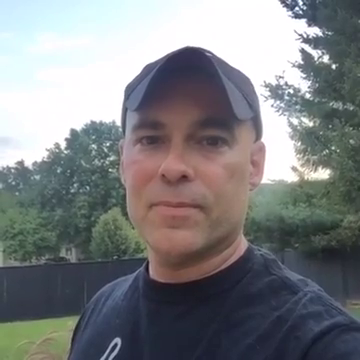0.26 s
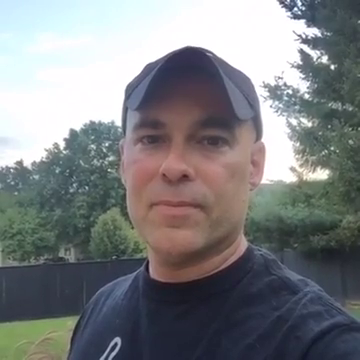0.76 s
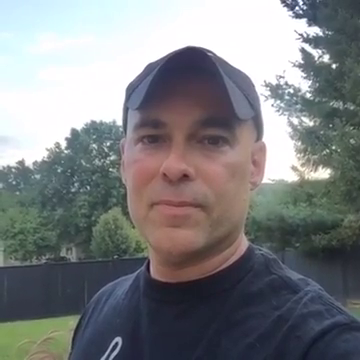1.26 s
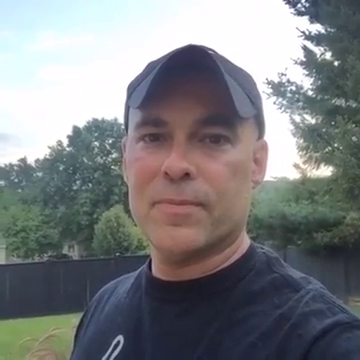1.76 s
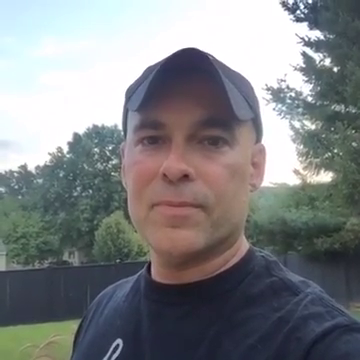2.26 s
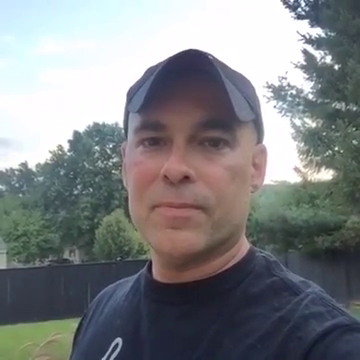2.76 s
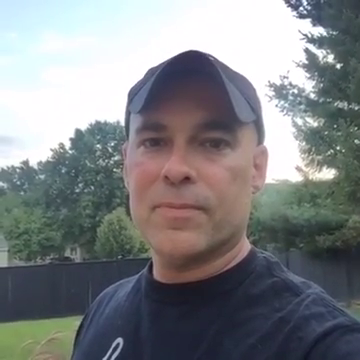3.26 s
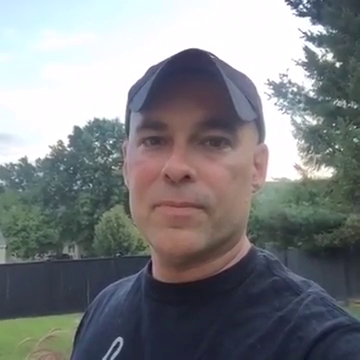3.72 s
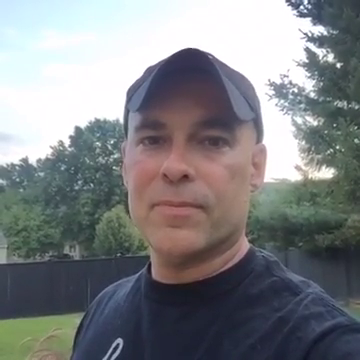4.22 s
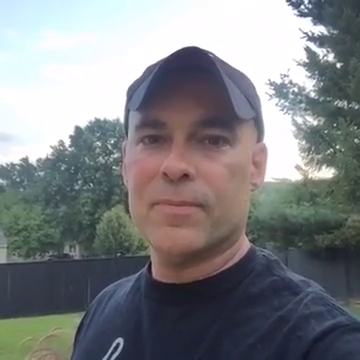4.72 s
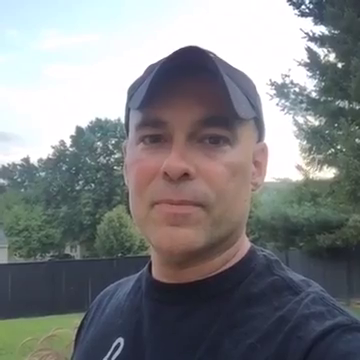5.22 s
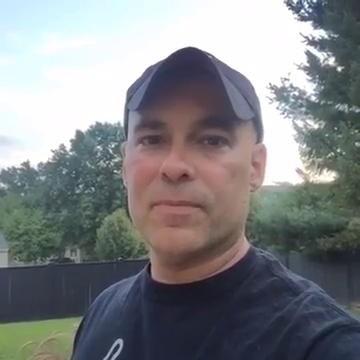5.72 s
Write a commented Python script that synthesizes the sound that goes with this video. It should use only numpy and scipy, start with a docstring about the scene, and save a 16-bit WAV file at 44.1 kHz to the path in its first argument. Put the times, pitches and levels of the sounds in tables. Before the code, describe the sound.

From the start, a steady, high chorus of crickets and far insects fills a backyard at dusk. Two cicadas buzz in the trees, pulsing out of step: one bright and sizzling, the other duller with a slight ring. The brighter one grows louder at around 1 second, and both quicken gradually from about four or five pulses a second to about seven. Underneath, distant traffic rumbles, a machine hums faintly, and soft road whines come and go, at around 2.6, 3.4 and 5.4 seconds. A vehicle slowly draws nearer. Its low exhaust drone emerges and throbs at about 3.4 seconds, then becomes louder and harsher from around 4 seconds. The hiss of its tyres keeps growing until the end, at about 6 seconds, with the insects still singing above it.

```python
"""A backyard at dusk. From the start, two cicadas pulse out of step in the trees, buckling their ribs in
fast clicks, over a steady chorus of far insects and crickets trilling with their wings. Distant traffic
rumbles, a machine hums faintly, and road whines come and go. As the cicadas quicken, a vehicle draws
slowly nearer: its droning exhaust throbs at about 3.4 s, then turns harsher, and the hiss of its tyres
grows to the end."""
import sys
import numpy as np
from scipy import signal
from scipy.fft import rfft, irfft, next_fast_len
from scipy.io import wavfile

SR = 44100
rng = np.random.default_rng(int(sys.argv[2]) if len(sys.argv) > 2 else 0)


def to_wav(s):
    """Save 16-bit WAV."""
    ch = np.atleast_2d(s).T  # columns
    pcm = np.round(np.clip(ch, -1, 1) * 32767)  # PCM
    wavfile.write(sys.argv[1], SR, pcm.astype(np.int16))


N = 263714
TIME = np.arange(N) / SR


def from_db(db):
    """Turn decibels into a number to multiply a sound by."""
    return np.exp(np.asarray(db) * (np.log(10) / 20))


def rms_one(x):
    """Scale a sound so that its average strength (rms) is 1."""
    return x / np.sqrt(np.mean(x ** 2) + 1e-20)


def in_time(rows):
    """Join a table's points with straight lines: one curve for each column after the time."""
    times, *columns = np.transpose(rows)
    return [np.interp(TIME, times, column) for column in columns]


def coloured(x, points):
    """Make some pitches stronger than others, fading 20 dB an octave beyond the table's ends; rms 1."""
    hz, db = np.transpose(points)
    size = next_fast_len(N, real=True)
    octave, known = np.log2(np.fft.rfftfreq(size, 1 / SR) + 1), np.log2(hz)
    outside = np.abs(octave - np.clip(octave, known[0], known[-1]))
    gain = from_db(np.interp(octave, known, db) - 20 * outside)
    return rms_one(irfft(rfft(x, size) * gain, size)[:N])


def above(x, hz):
    """The part of a sound above a frequency."""
    return signal.sosfiltfilt(signal.butter(6, hz, "high", fs=SR, output="sos"), x)


def drift(rate):
    """A smooth random wobble of rms 1, changing about rate times a second."""
    step = 40   # samples between random values
    memory = np.exp(-2 * np.pi * rate * step / SR)
    noise = rng.standard_normal(N // step + 2002)
    slow = signal.lfilter([1], [1, -2 * memory, memory ** 2], noise)[2000:]
    return np.interp(np.arange(N) / step, np.arange(len(slow)), rms_one(slow))


def swell_at(s, width_s):
    """A smooth rise and fall of height 1, peaking at time s."""
    return np.exp(-((TIME - s) / width_s) ** 2 / 2)


def fading_tone(hz, share, rate):
    """A tone that flutters because a share of it arrives by shifting paths."""
    angle = 2 * np.pi * (np.cumsum(hz) / SR % 1)
    direct = np.sqrt(2 * (1 - share)) * np.sin(angle)
    scattered = drift(rate) * np.sin(angle) + drift(rate) * np.cos(angle)
    return direct + np.sqrt(share) * scattered


def foliage(x, echo_s):
    """Leaves, fence and ground send back many tiny echoes, which fade by 60 dB in echo_s."""
    t = np.arange(SR // 4) / SR
    paths = rng.standard_normal(len(t)) * from_db(-60 * t / echo_s)
    with_lead_in = np.concatenate([x[-len(t):], x])
    return rms_one(signal.fftconvolve(with_lead_in, paths)[len(t):len(t) + N])


def rib_buzz(clicks_per_s, jitter, echo_s, far_share):
    """An insect's ribs buckle in fast, uneven clicks; part of the buzz arrives blurred to a hiss."""
    turns = np.cumsum(clicks_per_s * (1 + jitter * drift(150))) / SR
    clicks = np.diff(np.floor(turns), prepend=0) * from_db(rng.standard_normal(N))
    return np.sqrt(1 - far_share) * foliage(clicks, echo_s) + np.sqrt(far_share) * rng.standard_normal(N)


def pulse_progress(pulses):
    """How far a cicada is through its current pulse, from 0 to 1, and how hard it sings there."""
    starts, accent_db = np.transpose(pulses)
    edges = np.append(starts, 2 * starts[-1] - starts[-2])
    count = np.interp(TIME, edges, np.arange(len(edges)))
    return count % 1, np.interp(count, np.arange(len(starts)) + .5, accent_db)


def belly_swell(progress, lateness, sharpness, dip_db):
    """The belly stretches and relaxes: a swell from dip to dip, peaking late if lateness > 1."""
    swell = np.abs(np.sin(np.pi * progress ** lateness)) ** sharpness
    return from_db(dip_db) + (1 - from_db(dip_db)) * swell


# How the near cicada's song changes; its "top" lies above 10 kHz and its "sizzle" above 13 kHz:
# (time [s], level [dB], top boost [dB], further sizzle boost [dB], top's dip between pulses [dB])
NEAR_CICADA_SONG = [(0, -56, 5, 0, -7), (.7, -53.5, 3, 1, -7), (1.3, -46.5, -0.5, 1, -13),
                    (2.5, -46.3, 1, .5, -13), (3.4, -45, 0.3, -2.5, -14), (4.2, -43.5, -2.6, -8.5, -22),
                    (5.1, -44.9, -0.7, -5, -21), (5.98, -47.2, -1.6, -3, -18)]
# Its pulses, each lasting until the next: (start time [s], accent [dB])
NEAR_CICADA_PULSES = [(-.13, 0), (.08, 0), (.28, 0), (.51, .5), (.73, 1), (.928, -1), (1.125, 0), (1.31, 0),
                      (1.507, -1.5), (1.68, 0), (1.874, -.5), (2.061, -1.5), (2.248, -1), (2.425, 0),
                      (2.601, 0), (2.787, .5), (2.97, -1.5), (3.144, 0), (3.32, 0), (3.484, 0), (3.663, 0),
                      (3.847, -1), (3.989, -.5), (4.132, .5), (4.275, -.5), (4.421, -.5), (4.58, -.5),
                      (4.71, -.5), (4.876, 0), (5.021, -.5), (5.192, -1.5), (5.345, .5), (5.477, 1),
                      (5.611, -1.5), (5.76, 0), (5.932, -1)]
# The tone colour of its buzz: (frequency [Hz], relative level [dB])
NEAR_CICADA_COLOUR = [(2800, -60), (3900, -7), (5100, -17), (6200, 3.5), (7100, -2.5), (8200, -7.5),
                      (9000, -16), (9900, -16.5), (10300, -27.5), (11000, -27), (11600, -18),
                      (12600, -18.3), (14000, -23.5), (14400, -28.5), (15200, -32)]
def near_cicada():
    """A bright buzz whose pulses quicken unevenly; the top of each pulse swells before its body."""
    level_db, top_db, sizzle_db, top_dip_db = in_time(NEAR_CICADA_SONG)
    progress, accent_db = pulse_progress(NEAR_CICADA_PULSES)
    clicks = rib_buzz(clicks_per_s=680, jitter=.25, echo_s=.14, far_share=.28)
    buzz = coloured(clicks, NEAR_CICADA_COLOUR)
    top, sizzle = above(buzz, 10000), above(buzz, 13000)
    body = (buzz - top) * belly_swell(progress, lateness=1.6, sharpness=1.3, dip_db=-18)
    edge = (top + (from_db(sizzle_db) - 1) * sizzle) * from_db(top_db)
    edge *= belly_swell(progress, lateness=1.25, sharpness=1.25, dip_db=top_dip_db)
    tremble_db = .86 * drift(25)
    return from_db(level_db + accent_db + tremble_db) * (body + edge)


# The lower cicada's pulses: (time [s], relative buzz level [dB], ring level [dB])
LOW_CICADA_PULSES = [(.12, -47, -55.5), (.37, -47, -55.5), (.6, -48, -55.5), (.8, -49, -56.5),
                     (1.01, -48, -55), (1.25, -46.5, -60), (1.47, -45.5, -55.5), (1.635, -44, -55),
                     (1.85, -46, -56), (2.06, -46, -56), (2.22, -48, -55), (2.4, -48, -54),
                     (2.58, -48.5, -54.5), (2.77, -49, -55.5), (2.94, -48, -55.5), (3.12, -45.5, -59),
                     (3.31, -45.5, -59), (3.48, -45, -57.5), (3.68, -46, -59), (3.8, -50, -59),
                     (3.97, -47.5, -61), (4.1, -47, -57), (4.28, -46, -61), (4.43, -48, -61),
                     (4.56, -47, -60), (4.69, -46.5, -59), (4.85, -51, -62), (5.01, -48, -60),
                     (5.19, -47.5, -62), (5.32, -46, -59), (5.55, -47, -60), (5.71, -48, -60),
                     (5.86, -47, -58)]
# The tone colour of its buzz: (frequency [Hz], relative level [dB])
LOW_CICADA_COLOUR = [(2800, -28), (3400, -4.5), (3750, -7), (4000, 3), (4250, 0), (4600, 5), (5600, 6),
                     (6500, -28), (8000, -20), (10000, -53)]
def low_cicada(buzz_db=-3, ring_hz=4010):
    """A duller cicada's soft pulses run together as they quicken; its hollow body rings with each."""
    swells = sum(from_db(db) * swell_at(s, width_s=.043) for s, db, _ in LOW_CICADA_PULSES)
    chirps = sum(from_db(db) * swell_at(s, width_s=.027) for s, _, db in LOW_CICADA_PULSES)
    clicks = rib_buzz(clicks_per_s=520, jitter=.27, echo_s=.082, far_share=.8)
    buzz = coloured(clicks, LOW_CICADA_COLOUR)
    ring = fading_tone(ring_hz * (1 + .002 * drift(12)), share=.4, rate=45)
    return from_db(buzz_db) * swells * buzz + chirps * ring


def grainy_shimmer(length_s, spread_db, count=900):
    """Many short, faint tones at random pitches give the far buzz a grainy shimmer."""
    out = np.zeros(N + SR)
    for when, pitch, length, faintness in rng.random((count, 4)):
        size, start = int(SR * length_s * (.5 + length)), int(when * N)
        hz = 3500 + 5000 * pitch
        tone = np.sin(2 * np.pi * hz * np.arange(size) / SR)
        out[start:start + size] += from_db(-spread_db * faintness) * np.hanning(size) * tone
    return rms_one(out[:N])


# How loud the far insects are: (time [s], level [dB])
FAR_INSECT_LEVEL = [(0, -46), (1.2, -45.5), (1.9, -45), (2.6, -43.5), (4, -43.5), (5.2, -45.5), (5.98, -46)]
# Their tone colour: (frequency [Hz], relative level [dB])
FAR_INSECT_COLOUR = [(2700, -27), (3300, -13.5), (3650, -9.5), (4000, -6), (4900, -6), (5700, -0.5),
                     (6500, -0.5), (7500, -3.2), (8100, -9.3), (9000, -18), (9900, -24.5), (10300, -32.5),
                     (11000, -32), (12200, -30.5), (15200, -42)]
def far_insects(shimmer_db=-7):
    """Many far insects merge into one buzz, which has a grainy shimmer."""
    level_db, = in_time(FAR_INSECT_LEVEL)
    clicks = rib_buzz(clicks_per_s=1500, jitter=.4, echo_s=.067, far_share=.42)
    buzz = coloured(clicks, FAR_INSECT_COLOUR)
    shimmer = coloured(grainy_shimmer(length_s=.06, spread_db=19), FAR_INSECT_COLOUR)
    return from_db(level_db + .5 * drift(23)) * rms_one(buzz + from_db(shimmer_db) * shimmer)


# One row for each cricket: (wing pitch [Hz], level [dB], wing strokes [per s])
CRICKET_VOICES = [(4012, -72, 44), (4490, -71, 58), (4620, -73, 53), (5295, -67.5, 38), (5600, -64, 51),
                  (5674, -62, 47), (6000, -61, 55), (6127, -61, 41), (6250, -61, 62), (6394, -63, 45),
                  (6482, -61, 67), (6721, -65, 59), (6933, -63, 50), (7072, -60, 72), (7560, -63, 80),
                  (7950, -68, 64), (8400, -72, 70)]
def crickets(wander=.0018, sag=.0028, swell_db=2):
    """Each wing stroke rings a tone that sags in pitch; strokes run into a trill, blurred by leaves."""
    out = np.zeros(N)
    uneven_time = np.cumsum(1 + .0348 * drift(9.8)) / SR
    for hz, level_db, strokes_per_s in CRICKET_VOICES:
        stroke = (strokes_per_s * uneven_time + rng.random()) % 1   # 0 to 1 through each stroke
        pitch = hz * (1 + wander * drift(23.9) - sag * (stroke - .5))
        gain = from_db(level_db + swell_db * drift(12))
        out += gain * rms_one(stroke * (1 - stroke) * fading_tone(pitch, share=.43, rate=14.6))
    return out


def road_noise(colour, echo_share):
    """The roar of tyres and engines from afar; a share of it arrives as echoes."""
    direct, scattered = rng.standard_normal((2, N))
    echoes = foliage(scattered, echo_s=.06)
    return coloured(np.sqrt(1 - echo_share) * direct + np.sqrt(echo_share) * echoes, colour)


# The tone colour of far traffic: (frequency [Hz], relative level [dB])
RUMBLE_COLOUR = [(22, -33), (40, -10), (60, -2), (90, 1), (118, -3), (146, -1), (175, -10), (280, -20.5),
                 (380, -22), (470, -27), (680, -26), (950, -28), (1400, -30), (3000, -45.5)]
def traffic_rumble(level_db=-47.5):
    """Traffic on far roads blends into a low, wavering rumble."""
    return from_db(level_db + 1.3 * drift(22)) * road_noise(RUMBLE_COLOUR, echo_share=.4)


# How loud the tyres on far roads are: (time [s], level [dB])
FAR_TYRE_LEVEL = [(0, -60), (1, -60.5), (1.7, -63.5), (2.8, -59.5), (4.2, -59.5), (4.7, -60.5), (5.45, -56),
                  (5.98, -61)]
# Their tone colour: (frequency [Hz], relative level [dB])
FAR_TYRE_COLOUR = [(450, -16), (680, -10.5), (860, -2), (950, -.5), (985, -5), (1020, 1), (1070, 1),
                   (1130, -11), (1700, -14), (2600, -22)]
def far_tyres(flutter_db=2.2):
    """Tyres on far roads make an uneven wash, heard mostly as echoes."""
    level_db, = in_time(FAR_TYRE_LEVEL)
    return from_db(level_db + flutter_db * drift(14)) * road_noise(FAR_TYRE_COLOUR, echo_share=.75)


# The tones in the machine's hum: (pitch [Hz], level [dB])
HUM_TONES = [(58, -60), (91, -50.5), (360, -70), (544, -76)]
def machine_hum(wander_hz=1.59):
    """A machine hums faintly, each tone fading in and out."""
    return sum(from_db(db) * fading_tone(hz + wander_hz * drift(5.5), share=.41, rate=7)
               for hz, db in HUM_TONES)


# Whines from the road: (peak time [s], pitch [Hz], peak level [dB], half-width of the swell [s])
ROAD_WHINES = [(.3, 384, -73.5, 0.27), (1.8, 367.5, -73, 0.41), (2.6, 400, -63.5, 0.35),
               (3.1, 244, -59.5, 0.053), (3.4, 598, -63.5, 0.17), (5.4, 380.5, -63, 0.37)]
def road_whines():
    """Far, fluttering whines swell and die away, each on its own pitch."""
    return sum(from_db(db) * swell_at(s, width_s) * fading_tone(np.full(N, hz), share=.86, rate=22)
               for s, hz, db, width_s in ROAD_WHINES)


# The nearing vehicle's engine: (time [s], firing rate [Hz], relative exhaust level [dB])
ENGINE_RUN = [(0, 145.7, -53), (2.7, 146.2, -51), (3.35, 142.5, -40), (3.9, 140.5, -46.5),
              (4.05, 137.9, -36), (4.14, 133.5, -42.5), (4.24, 136.7, -33), (4.44, 134.4, -40),
              (4.58, 135.3, -30.5), (4.65, 136.1, -37.5), (4.8, 136.5, -35), (5.18, 137.4, -33),
              (5.25, 135.8, -36.5), (5.52, 136, -32.5), (5.58, 138.5, -29.5), (5.98, 132.6, -34)]
# The tones in its exhaust: (pitch [times the firing rate], relative level [dB])
EXHAUST_TONES = [(2 / 3, -18), (1, 0), (4 / 3, -22.5), (2, -20.5), (3, -23.5)]
# How harsh it is: (time [s], boost of the tones above the firing rate [dB])
EXHAUST_HARSHNESS = [(3.4, -10), (4.05, 1), (4.3, -21), (4.8, -2.5), (5.35, 1), (5.58, -2.5), (5.75, -4),
                     (5.98, -1)]
def vehicle_exhaust(trim_db=-3, throbs_per_s=7.8, throb_at_s=3.42, throb_depth=.55):
    """The engine's firing makes a drone that throbs for a while; its weaker tones flutter more."""
    firing_hz, level_db = in_time(ENGINE_RUN)
    harsh_db, = in_time(EXHAUST_HARSHNESS)
    beat = np.cos(2 * np.pi * throbs_per_s * (TIME - throb_at_s))
    throb = 1 + throb_depth * swell_at(throb_at_s, width_s=.35) * beat
    firing_hz *= 1 + .0089 * drift(21)
    drone = 0
    for multiple, db in EXHAUST_TONES:
        rough_share = .05 if multiple == 1 else .3
        gain = from_db(db + (multiple > 1) * harsh_db)
        drone += gain * fading_tone(multiple * firing_hz, rough_share, rate=15)
    return from_db(level_db + trim_db) * throb * drone


# How loud the vehicle's tyres are: (time [s], level [dB])
NEAR_TYRE_LEVEL = [(0, -76.5), (2, -63), (3.3, -59.5), (4.3, -54), (5.2, -50.5), (5.98, -48)]
# Their tone colour: (frequency [Hz], relative level [dB])
NEAR_TYRE_COLOUR = [(90, -49), (180, 14), (260, -7.5), (330, -7), (400, -6.5), (470, -9.5), (700, -3),
                    (950, -4), (1300, -1), (2000, -3.5), (2800, -10.5), (4500, -5.5), (9000, -49)]
def vehicle_tyres():
    """The tyres hiss louder as the vehicle nears."""
    level_db, = in_time(NEAR_TYRE_LEVEL)
    return from_db(level_db) * road_noise(NEAR_TYRE_COLOUR, echo_share=.25)


def scene():
    """Insects, far background and the nearing vehicle, added into one channel."""
    insects = near_cicada() + low_cicada() + far_insects() + crickets()
    background = traffic_rumble() + far_tyres() + machine_hum() + road_whines()
    vehicle = vehicle_exhaust() + vehicle_tyres()
    return (insects + background + vehicle)[None]


def record(dry):
    """The highest treble is cut away steeply."""
    cutoff_hz = 15200
    return signal.sosfilt(signal.ellip(12, .1, 90, cutoff_hz, fs=SR, output="sos"), dry)


dry = scene()
out = record(dry)
to_wav(out)
```